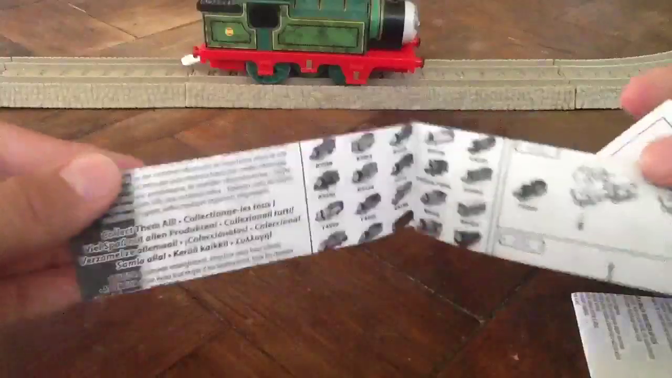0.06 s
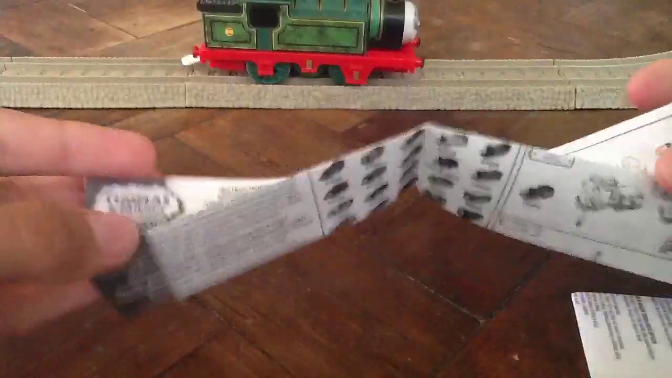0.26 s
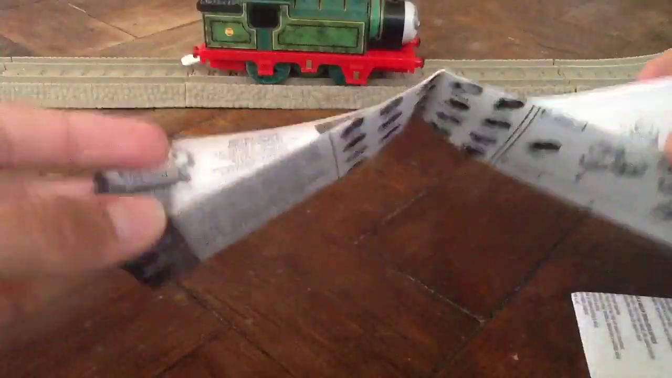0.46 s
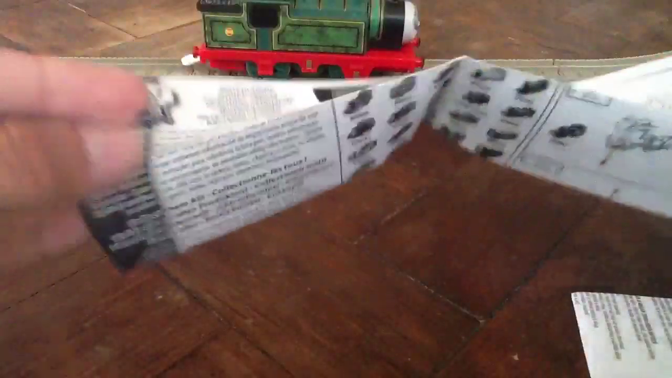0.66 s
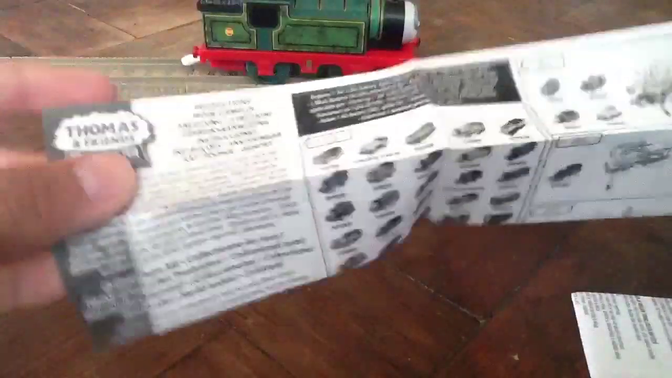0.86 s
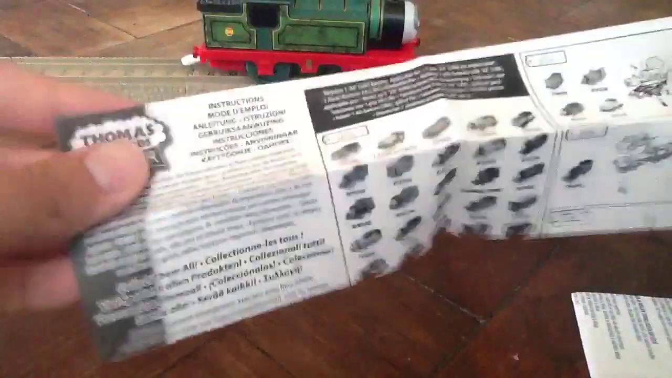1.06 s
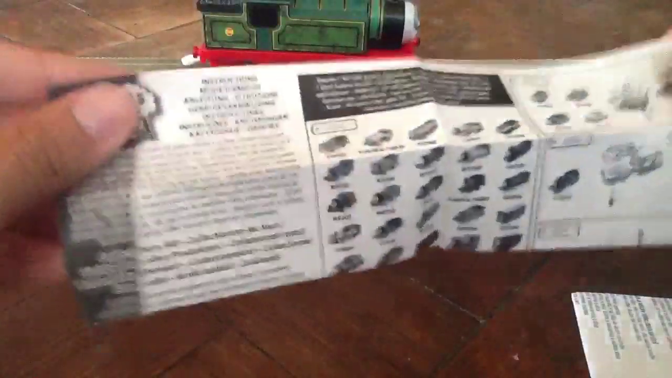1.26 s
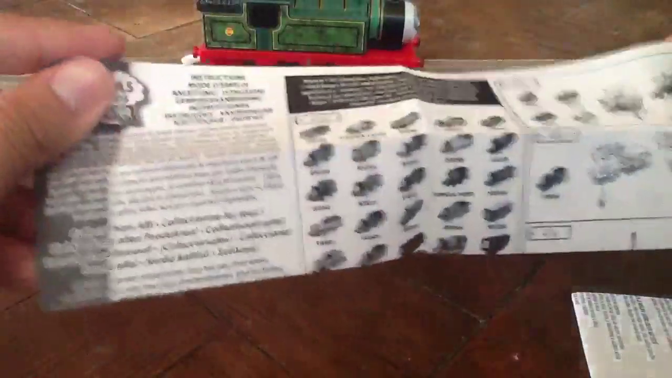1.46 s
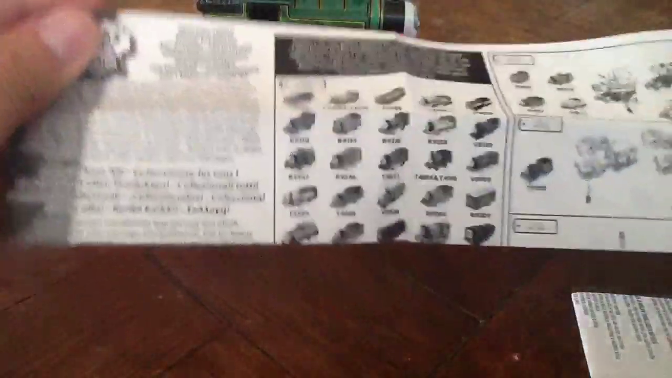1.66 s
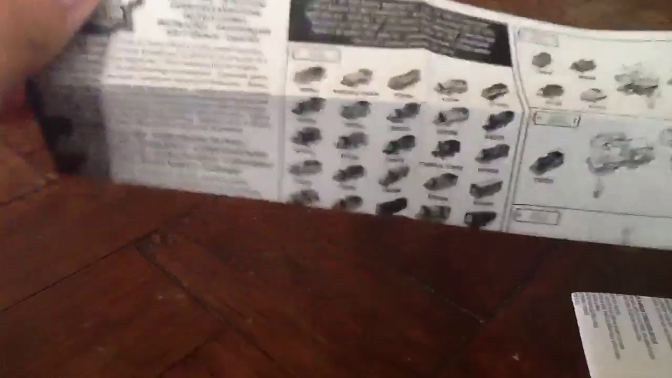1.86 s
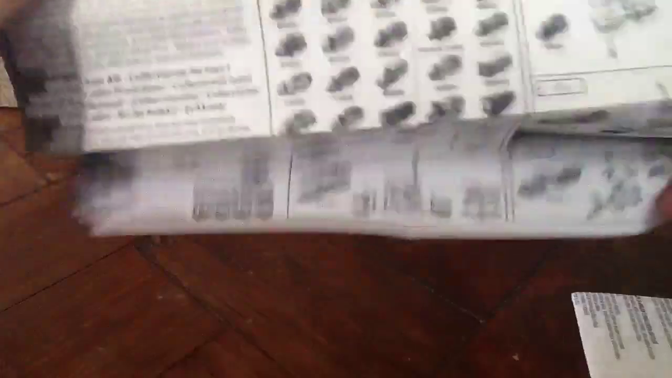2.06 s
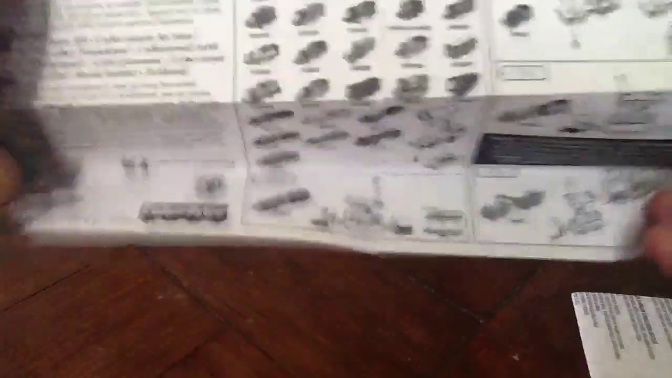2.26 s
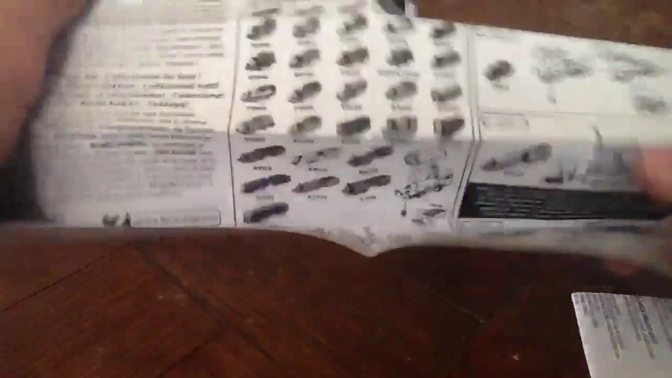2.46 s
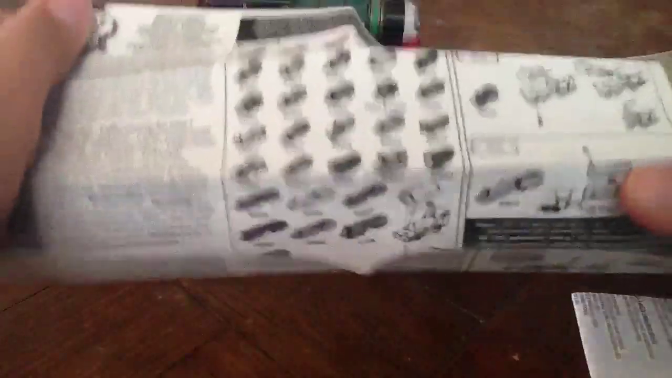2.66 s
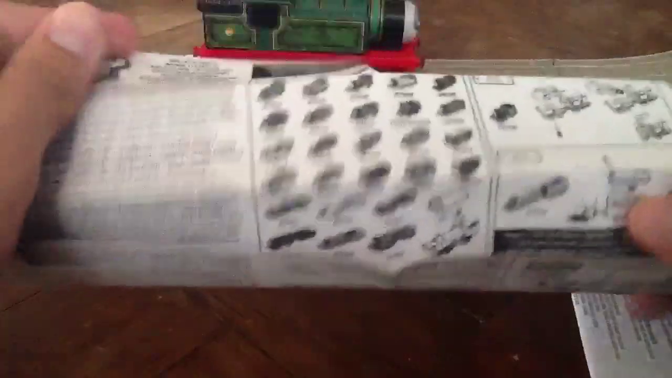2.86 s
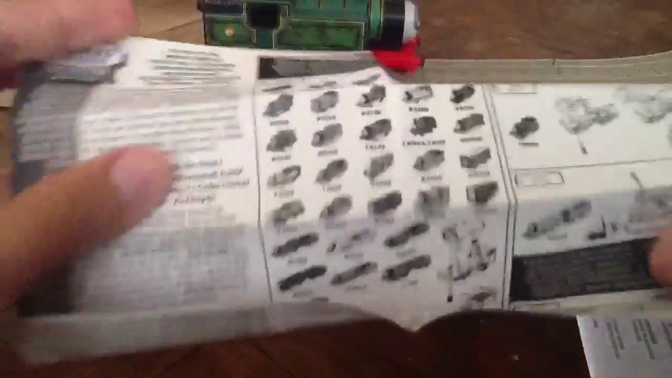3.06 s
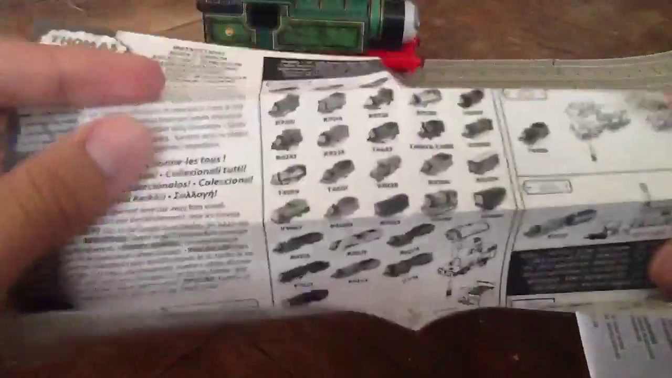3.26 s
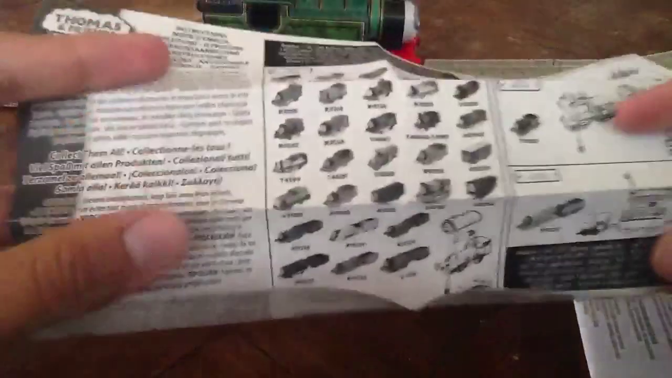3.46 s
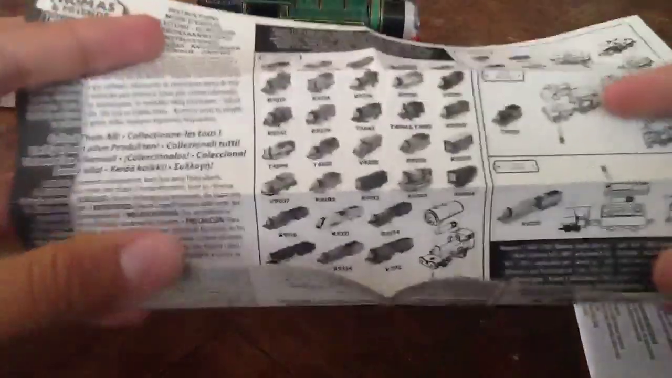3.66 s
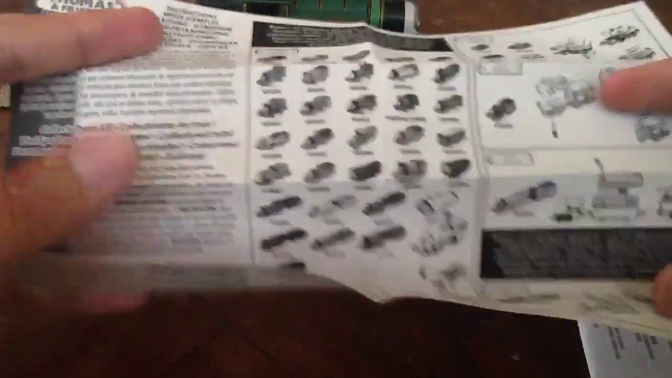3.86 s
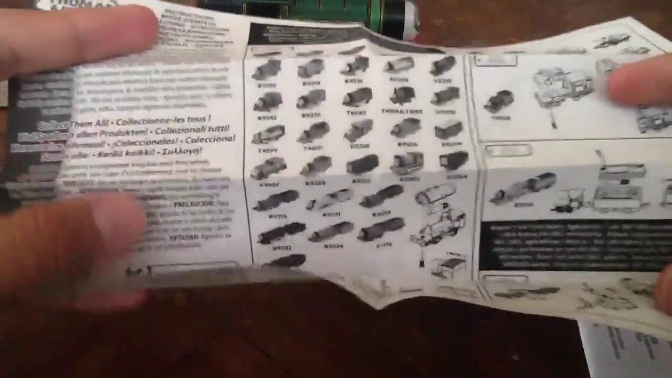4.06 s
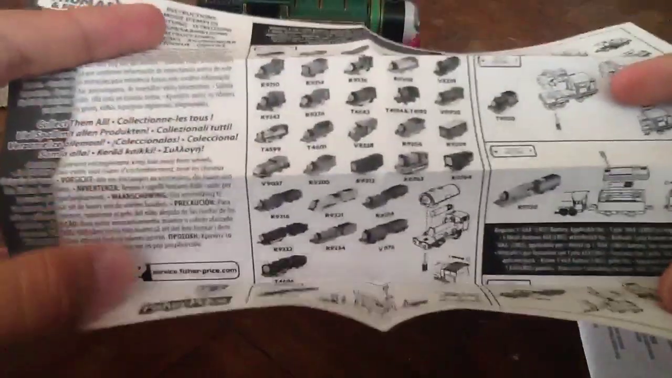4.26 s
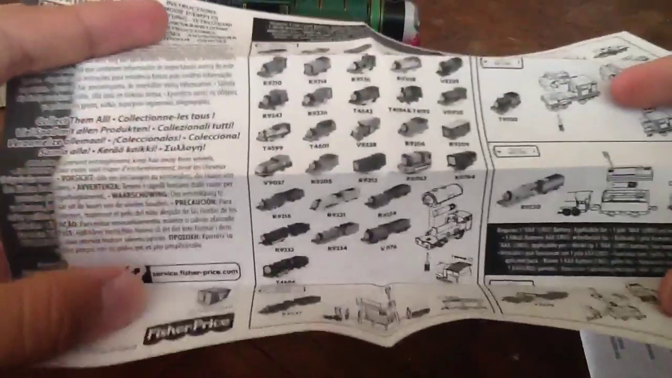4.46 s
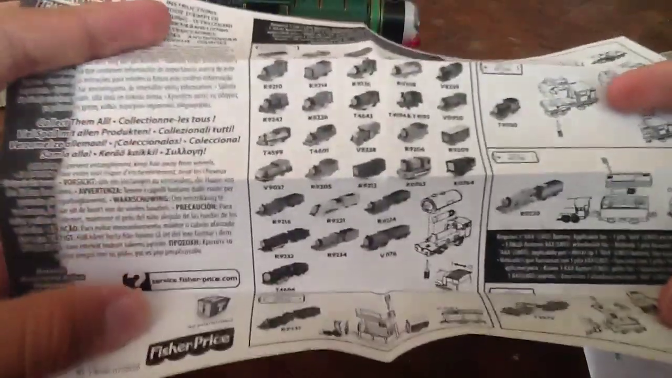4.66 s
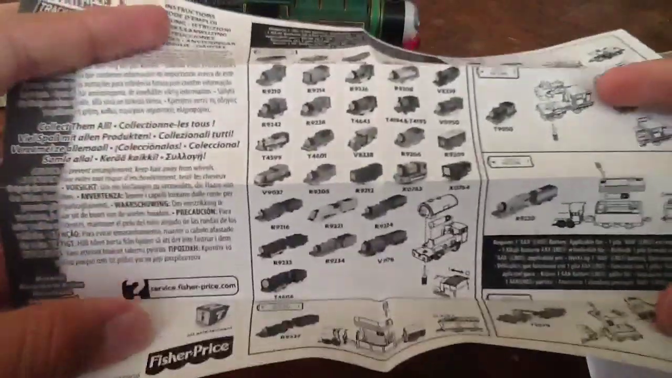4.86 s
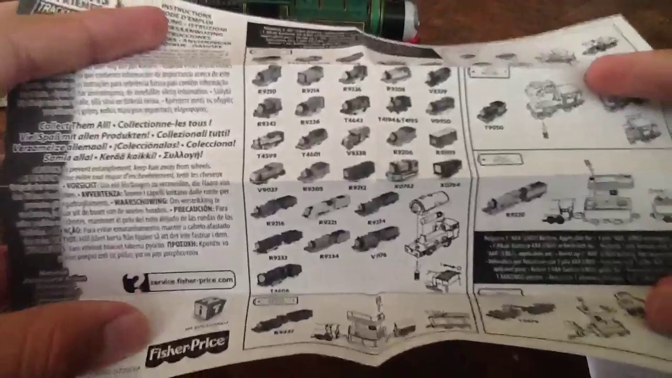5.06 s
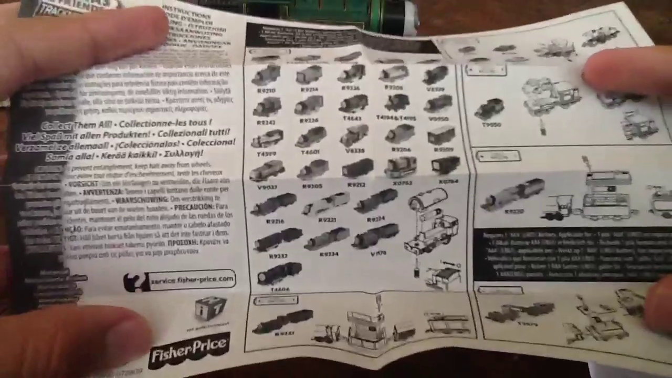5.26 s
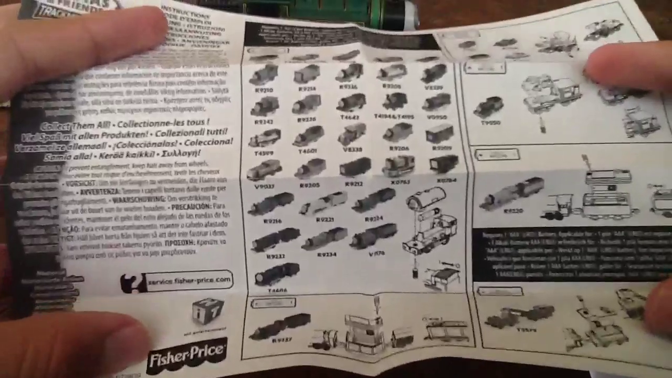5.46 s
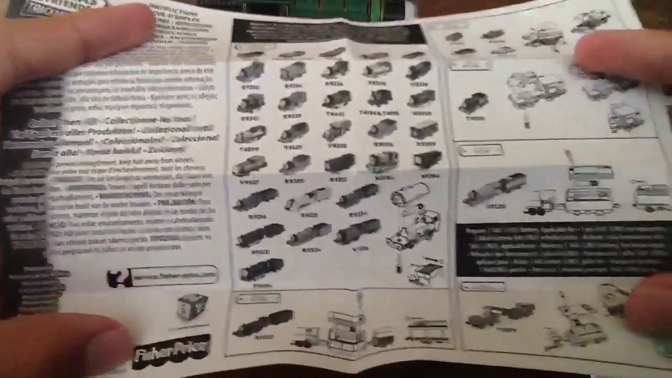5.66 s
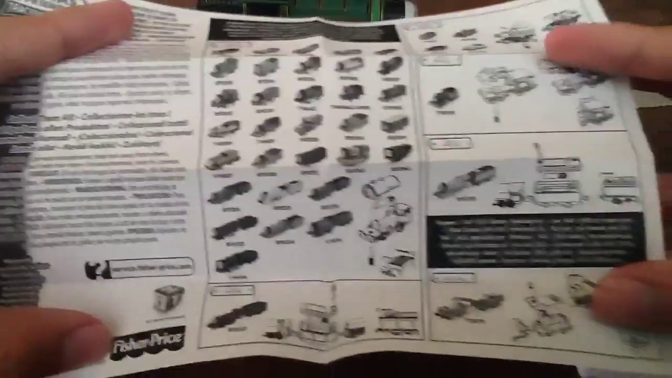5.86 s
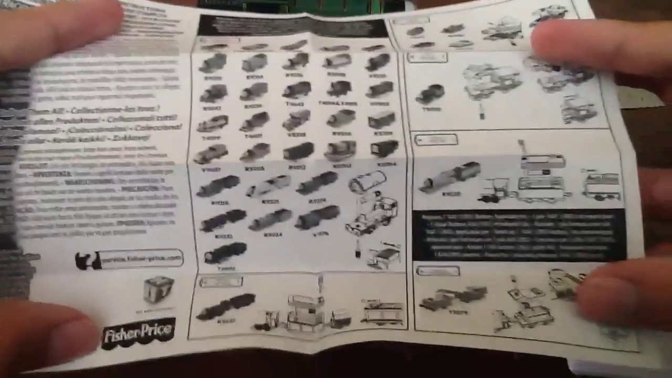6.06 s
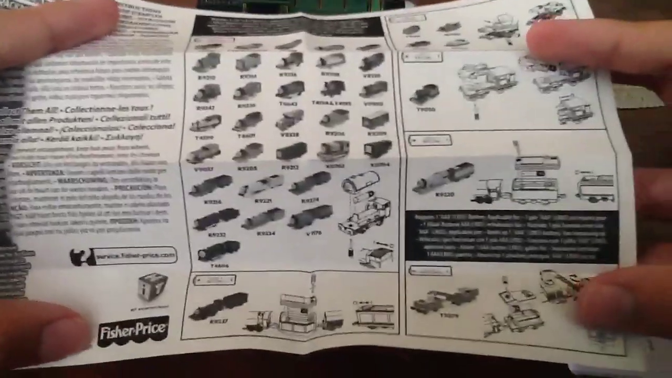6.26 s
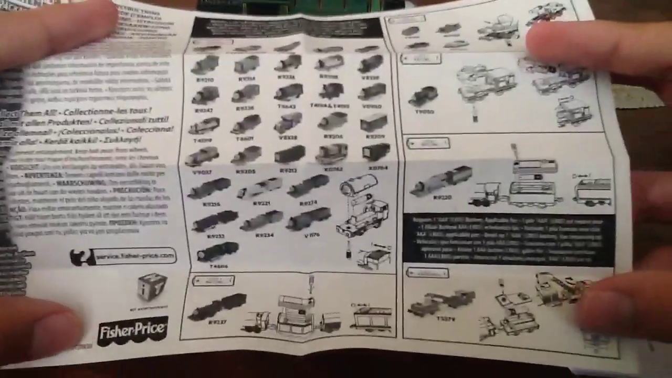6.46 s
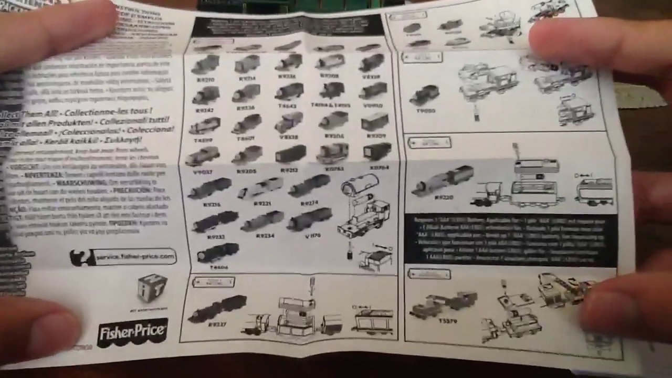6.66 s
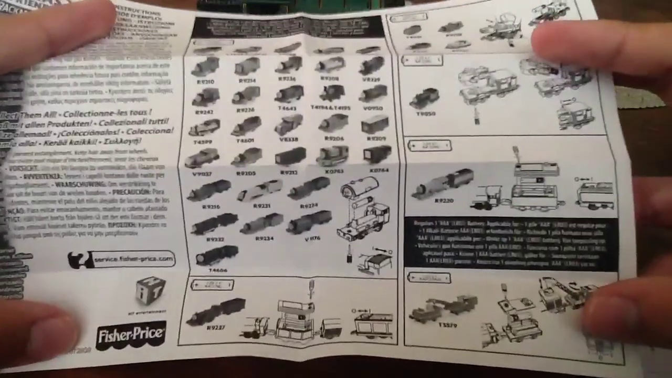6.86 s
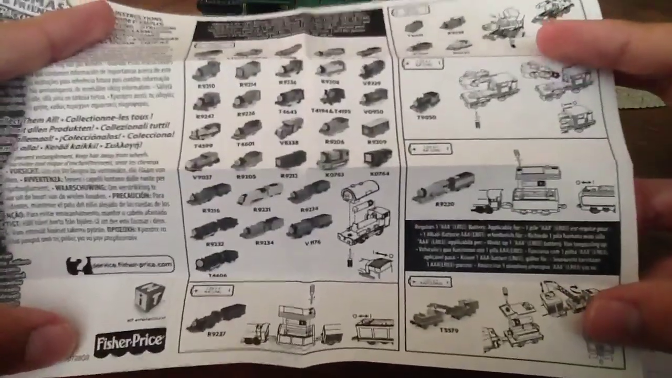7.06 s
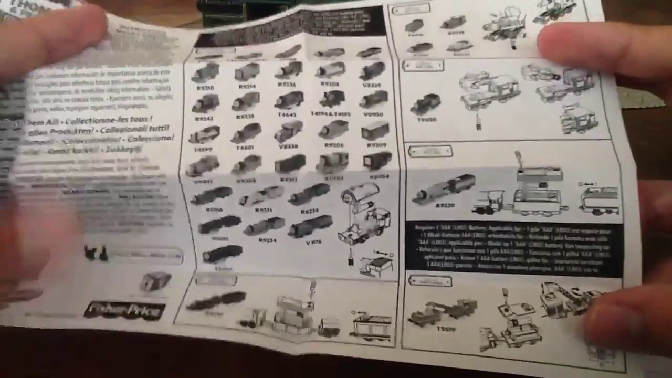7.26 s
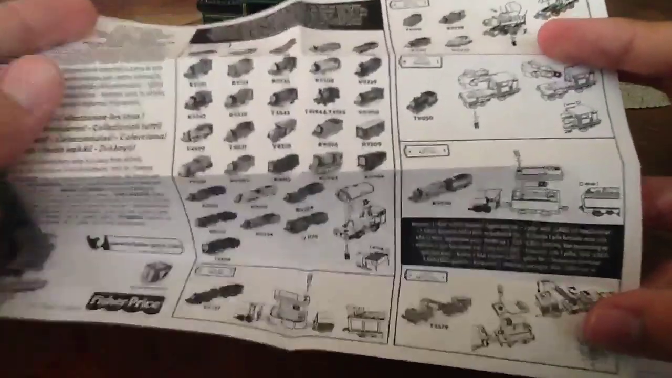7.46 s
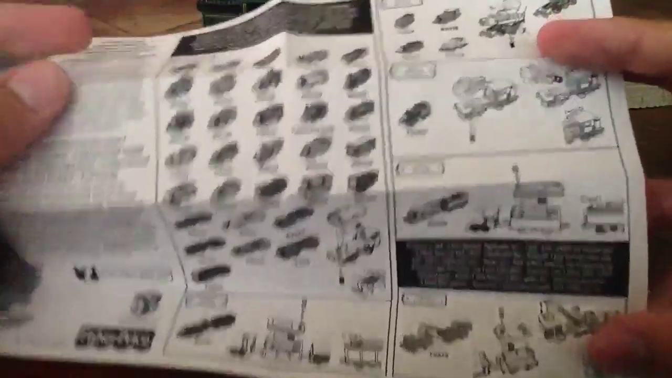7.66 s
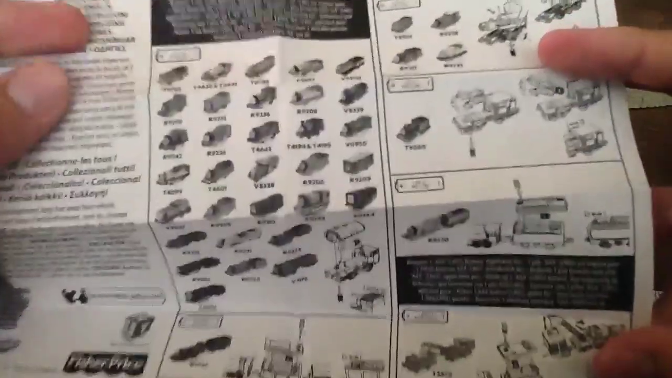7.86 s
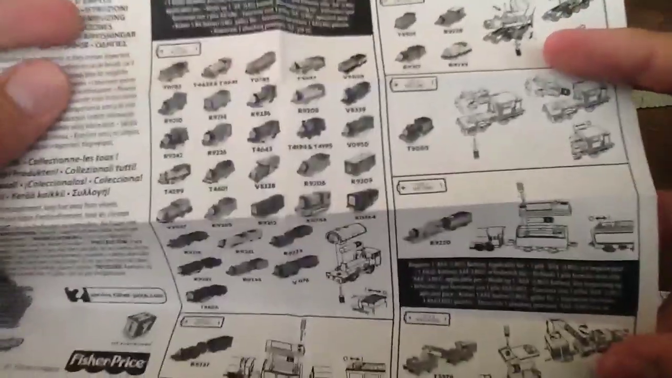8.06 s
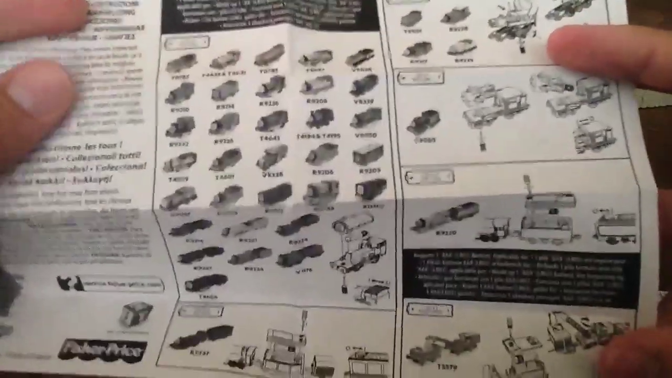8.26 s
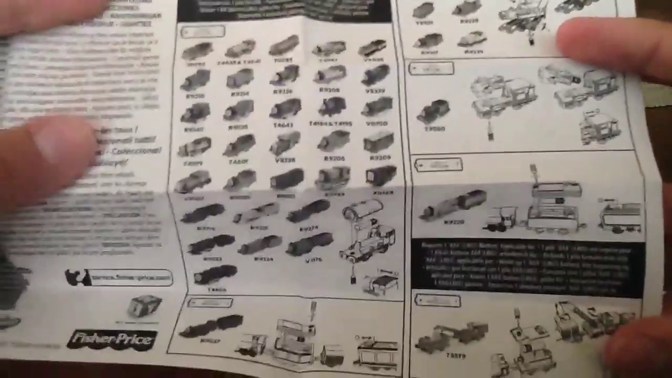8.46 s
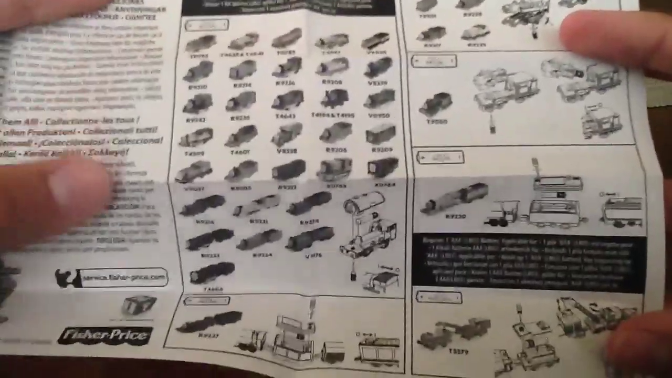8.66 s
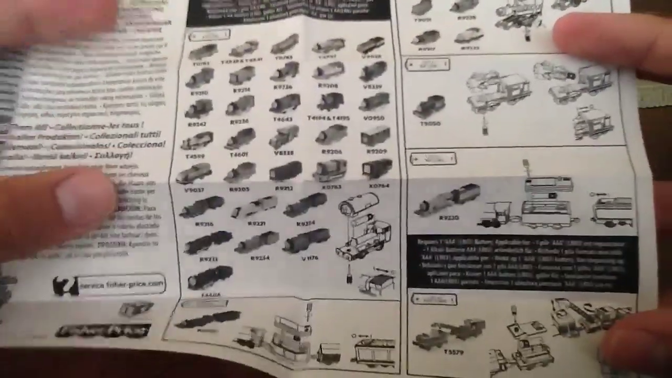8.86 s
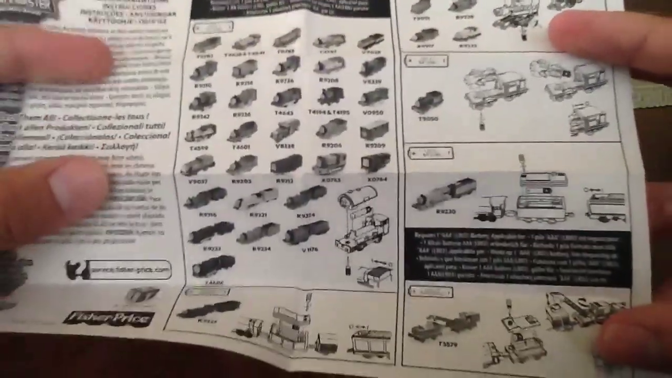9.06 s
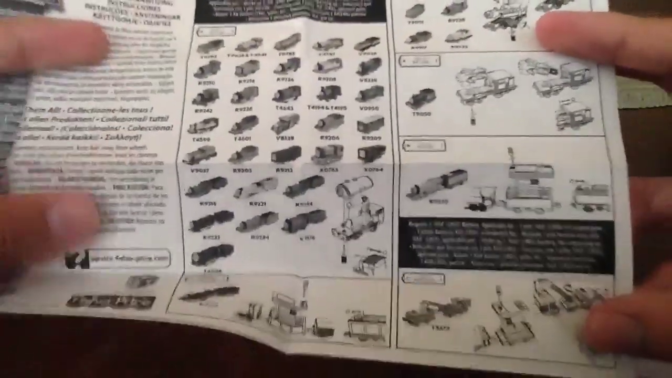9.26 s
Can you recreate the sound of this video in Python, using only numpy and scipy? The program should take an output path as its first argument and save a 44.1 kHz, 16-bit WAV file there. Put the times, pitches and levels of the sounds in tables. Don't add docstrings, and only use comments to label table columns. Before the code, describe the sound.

Thin folded paper crinkles and pops open in quick bursts, one loud snap, then faint finger rustles and small creaks over low room hum.

```python
import sys
import numpy as np
from scipy import signal
from scipy.fft import rfft, irfft
from scipy.io import wavfile
from scipy.ndimage import uniform_filter1d

SR = 44100
rng = np.random.default_rng(int(sys.argv[2]) if len(sys.argv) > 2 else 0)


def waveform_to_disk(signal):
    frames = np.transpose(np.atleast_2d(signal))
    scaled = np.clip(frames, -1, 1) * 32767
    samples = np.round(scaled).astype(np.int16)
    wavfile.write(sys.argv[1], SR, samples)


def volts(x):
    e = np.asarray(x, float) / 20
    return 10 ** e


N = 410130
HZ = np.fft.rfftfreq(N, 1 / SR)

# start in seconds, peak in dB, ring pitch in Hz,
# thump in dB, crisp edge in dB.
SNAPS = [(0.0439, -25, 1920, -9.5, -32), (0.1938, -21.5, 5100, -30, -7), (0.5375, -22, 4250, -11, -11),
         (0.848, -24.5, 1750, -30, -26), (1.624, -37.5, 2480, 2, -21), (1.8262, -35.5, 3500, -27, -26),
         (1.952, -14, 4500, -39, -10), (2.471, -32, 4040, -14, -7), (2.6193, -13.5, 2680, -11, -32),
         (2.8411, -35.5, 3500, -4, -25), (3.0047, -32.5, 1820, -3, -23), (3.1002, -26.5, 1150, 1, -30),
         (3.1661, -13, 4700, -5, -43), (7.8839, -28, 1940, 6, -26), (7.9043, -19, 1530, -26, -13),
         (3.752, -7.5, 4900, -4.5, -9)]
# start in seconds, peak in dB, ring pitch in Hz,
# thump in dB, crisp edge in dB.
POPS = [(0.3768, -34.5, 1660, -2, -27), (0.753, -24.5, 1700, -5, -13), (0.8885, -17, 4300, -8.5, -2),
        (1.263, -36, 1720, 1, -11), (1.5957, -37.5, 1670, -22, -23), (2.0356, -20.5, 4030, -16.5, -10.5),
        (2.2191, -38, 2000, -2, -5), (2.2902, -30.5, 3750, -3, -16), (3.217, -30, 1650, -15, -2.5),
        (3.5786, -25, 4900, -9, -7.5), (7.477, -27.5, 3380, -7, -35), (7.9249, -31, 1660, 5, -19),
        (0.1864, -28.5, 5070, -32, -6), (1.9443, -19, 3700, -9, -28), (0.8871, -18.5, 2820, -22, -29),
        (3.7548, -16, 3440, -4.5, -7.5)]
# start in seconds, peak in dB, ring pitch in Hz, thump in dB.
CRUMPLES = [(0.0099, -36.5, 3950, -2), (0.3512, -35, 4070, -26), (0.879, -28, 2650, -25),
            (1.0642, -37, 3630, -27), (1.1122, -38.5, 3790, -27), (1.3936, -39.5, 1810, 4),
            (1.51, -40.5, 5470, 2.5), (1.5426, -44.5, 1760, 3), (1.7261, -36.5, 6000, 0),
            (1.922, -18, 3650, -12), (2.1877, -40, 4080, 4), (2.5992, -37, 4460, -5),
            (2.6101, -25, 4360, -12), (2.6977, -39, 4120, 0), (3.0253, -36, 1600, 3),
            (3.0498, -34, 1970, -12), (3.3025, -31, 4950, -28), (4.1098, -44, 3450, -14),
            (4.2047, -31.5, 1500, 2), (5.9067, -43.5, 4360, -2), (6.076, -43.5, 4930, -6),
            (6.3498, -46.5, 4500, 2.5), (6.9511, -42, 3000, -2), (8.4376, -48, 1670, -5),
            (8.7131, -44.5, 4000, -7), (9.2148, -39, 1670, -4), (7.08, -50, 1350, 0),
            (0.018, -38, 1700, -10)]
# start in seconds, peak in dB, ring pitch in Hz.
TICKS = [(0.1445, -41.5, 5760), (1.2906, -45, 1720), (2.743, -36, 4230), (4.413, -51.5, 4200),
         (4.502, -52, 4200), (4.549, -48.5, 4200), (4.604, -49.5, 4250), (4.66, -47, 4200),
         (4.707, -50, 4200), (4.8098, -43, 4330), (4.943, -43, 4300), (5.117, -53, 4400),
         (5.135, -47.5, 4300), (5.22, -48.5, 3030), (5.338, -52, 2300), (5.666, -43, 4160),
         (3.141, -40, 1200), (0.56, -40, 1460), (1.767, -41, 1600), (8.403, -45.5, 1610),
         (6.388, -53, 4300), (6.569, -52, 2940), (6.597, -55, 2500), (6.7, -52, 4380),
         (7.3153, -39.5, 2990), (7.442, -39.5, 4200), (7.786, -44, 1530), (7.85, -44, 1500),
         (8.083, -44, 1300), (4.927, -49, 4400), (4.962, -48, 4700), (1.388, -44, 2500), (0.522, -44, 4000),
         (9.05, -49, 4200)]
SNAP_MS, POP_MS, CRUMPLE_MS, TICK_MS = 2.6, 4.2, 8, 2.5
TICK_THUMP_DB, TICK_EDGE_DB = -4, -12
CRUMPLE_EDGE_DB, DULL_ABOVE_DB, DULLING = -6, -39, 2.8

# frequency in Hz, bandwidth in Hz, level in dB.
SHEET = [(415, 137, -1), (823, 72, 0.5), (1129, 49, -7.5), (1710, 62, -4.5), (1774, 82, -1.5),
         (2700, 88, -1.5)]
# frequency in Hz, density in dB per Hz.
PAPER = [(350, 8), (600, -7), (682, -5), (786, -3.5), (1300, -7.5), (1540, 0.5), (2470, -4.5), (2850, -3.5),
         (3540, -1.5), (4140, 0.5), (6080, -1.5), (7570, -15.5), (13000, -11.5)]

# start in seconds, length in seconds,
# rustle in dB, body relative to the rustle in dB.
UNFOLD = [(0.0, 0.056, -50.5, -6), (0.203, 0.1, -52, -11), (0.301, 0.1, -50.5, -12),
          (0.471, 0.024, -47.5, -17), (0.52, 0.044, -60, -1), (0.641, 0.054, -48, -15.5),
          (0.733, .1, -49, -14), (0.846, 0.059, -43.5, -6.5), (0.937, 0.21, -52, -6.5),
          (1.239, 0.059, -53, -7), (1.34, 0.047, -53, -4), (1.377, 0.038, -46.5, -13),
          (1.384, 0.35, -55.5, -9), (1.914, 0.032, -52, 8.5), (1.958, 0.06, -46.5, -23),
          (2.025, 0.03, -47.5, -3), (2.2, 0.027, -48.5, -2.5), (2.264, 0.077, -48.5, -8),
          (2.385, 0.15, -48.5, -9), (2.575, 0.02, -49, -15), (2.59, 0.031, -42, -18),
          (2.628, 0.13, -57.5, -4), (2.833, 0.26, -49, -5.5), (3.057, 0.25, -53.5, -8),
          (3.288, 0.051, -49.5, -6), (3.397, 0.12, -54, -10), (3.558, 0.017, -43.5, -5),
          (3.592, 0.092, -53.5, -5), (3.738, 0.01, -45, -5), (3.765, 0.055, -43.5, -1),
          (3.825, 0.058, -51.5, -1), (3.888, 0.044, -51, -7), (3.981, 0.062, -51.5, -5),
          (4.123, 0.041, -54, -2.5), (0.088, 0.012, -55, -9), (1.0, 0.036, -49, -11),
          (1.056, 0.024, -49, -16), (1.165, .035, -59, -13), (2.883, 0.024, -51, 1),
          (3.224, 0.041, -46.5, -5), (3.456, 0.024, -59, -3), (2.628, 0.015, -49, 6.5)]
# start in seconds, length in seconds,
# rustle in dB, body relative to the rustle in dB.
HOLD = [(4.871, 0.11, -57, -4), (5.011, 0.063, -56, -5), (5.062, 0.36, -66.5, -1), (5.267, 0.044, -61, -6),
        (5.445, 0.12, -65.5, -0.5), (5.506, 0.15, -59, -6), (5.636, 0.11, -55.5, -4),
        (5.753, 0.11, -63.5, 1), (5.835, 0.11, -56, -3.5), (5.95, 0.33, -65.5, 0), (6.074, 0.09, -56, -12),
        (6.345, 0.27, -62, -3.5), (6.872, 0.26, -63.5, -4), (6.992, 0.1, -60.5, 2.5),
        (7.192, 0.063, -54, -7), (7.246, 0.75, -63.5, -4.5), (7.328, 0.024, -51, -10),
        (7.36, .144, -59, -3.5), (7.589, 0.16, -55, -13), (7.812, 0.066, -56, -2), (7.884, .052, -54.5, -5),
        (8.046, 0.082, -49.5, -8.5), (8.198, 0.55, -60.5, -10), (8.525, 0.091, -56, -9),
        (8.685, 0.06, -52.5, -4), (8.786, 0.71, -57, -9.5), (9.017, 0.14, -57.5, -6),
        (9.107, 0.031, -51, -5), (9.151, 0.022, -47, -3.5), (9.178, 0.046, -54.5, 1),
        (5.159, 0.016, -59, 1), (8.728, 0.021, -56, -3), (9.276, 0.033, -52.5, -9)]
# time in seconds, rustle in dB.
GRIP = [(0, -59), (.6, -56.5), (1.1, -60), (1.2, -61.5), (1.9, -57.5), (2.15, -60), (2.3, -56.5),
        (3.5, -51.5), (3.68, -62), (3.95, -59), (4.18, -61), (4.21, -50), (4.26, -61), (4.3, -67.5),
        (9.3, -82)]
# start in seconds, length in seconds, hiss in dB.
WIPES = [(0.141, 0.016, -50), (0.18, 0.031, -54), (0.317, 0.042, -51.5), (1.1, 0.033, -52),
         (1.238, 0.034, -56.5), (1.721, .05, -55.5), (2.204, .06, -56), (2.39, 0.029, -51),
         (2.44, 0.04, -51), (2.588, .04, -48), (3.218, .05, -55), (3.567, 0.029, -53), (2.874, 0.071, -61),
         (3.015, 0.047, -57), (3.34, .04, -59), (7.195, 0.058, -56.5), (7.588, 0.081, -62),
         (8.992, 0.079, -64)]
GRIP_BODY_DB, BRIGHT_DB = -11, -3.5
HISS_DB, HISS_SLOPE, HISS_FLOOR_DB = -7.5, -0.016, -75
SAG_DB, RELEASE_S = -2, 0.0029

# start in seconds, peak in dB, pitch in Hz.
FLAPS = [(0.009, -43, 235), (0.884, -38, 290), (1.743, -49, 230), (1.917, -33, 324), (1.945, -32.5, 370),
         (2.035, -37.5, 242), (2.195, -37.5, 194), (2.225, -41.5, 340), (2.283, -43, 171),
         (2.308, -43, 147), (2.465, -43, 179), (2.506, -48.5, 260), (2.613, -29.5, 320),
         (2.689, -45.5, 188), (3.024, -44, 236), (3.094, -44.5, 215), (3.139, -40, 251), (3.157, -36, 282),
         (3.213, -43, 252), (3.559, -38.5, 286), (1.941, -27.5, 685), (3.746, -36, 298), (3.905, -50, 260),
         (4.2, -45, 344), (7.224, -49.5, 550), (7.477, -38, 252), (7.897, -43, 222), (7.924, -39.5, 230),
         (8.078, -51, 304), (8.7, -49.5, 267), (9.209, -50.5, 270), (0.136, -47.5, 414),
         (1.059, -49.5, 240), (2.036, -35.5, 750), (2.052, -40, 303), (2.062, -48, 820), (2.222, -46, 780),
         (2.385, -45, 605), (2.524, -50, 330), (2.946, -50, 253), (3.24, -61, 700), (5.874, -49.5, 270),
         (7.492, -47, 245), (7.605, -53, 604), (7.847, -52, 250), (8.047, -51, 560), (8.353, -50, 260)]

ROOM_T60_S, ROOM_WET_DB = 0.23, -14.5
# frequency in Hz, density in dB per Hz.
ROOM = [(24, -69), (40, -21), (95, -11), (120, -3.5), (160, -1.5), (240, -0.5), (291, 0.0), (496, -6.0),
        (886, -16.5), (2220, -18), (5440, -22)]
ROOM_DB = -56.5
# frequency in Hz, level in dB.
HUM = [(177.6, -70), (240, -65), (360.7, -70), (2358, -84.5), (8291, -90)]

DUCK_S, DUCK_DB, RECOVER_S = 3.752, -1.5, 1.54
# frequency in Hz, step in dB over the usual line at 11-12 kHz.
STEP = [(12000, -40), (12400, -8), (13100, -3), (13160, 2), (13790, 3), (13830, 12), (15400, 8.5),
        (15450, 40)]
MASK_ABOVE_DB, MASKING = 13, 0.24


def buckles():
    rows = [(*row, SNAP_MS) for row in SNAPS]
    rows += [(*row, POP_MS) for row in POPS]
    for row in CRUMPLES:
        edge_db = CRUMPLE_EDGE_DB - DULLING * max(row[1] - DULL_ABOVE_DB, 0)
        rows.append((*row, edge_db, CRUMPLE_MS))
    rows += [(*row, TICK_THUMP_DB, TICK_EDGE_DB, TICK_MS) for row in TICKS]
    return rows


def sheet(t, detune):
    ring = 0
    for (hz, width_hz, db), d in zip(SHEET, detune):
        mode = np.sin(2 * np.pi * hz * (1 + 0.019 * d) * t)
        ring = ring + volts(db) * mode * np.exp(-np.pi * width_hz * t)
    return ring


def snaps():
    size = 4096
    out = np.zeros(N + size)
    t, f = np.arange(size) / SR, np.fft.rfftfreq(size, 1 / SR)
    broad = shape(PAPER, f) * bell(f, 2640, 0.97)
    rows = buckles()
    noises = rng.standard_normal((len(rows), 4, size))
    for (s, peak_db, hz, thump_db, edge_db, ms), noise in zip(rows, noises):
        tau = np.clip(ms, 1.2, 6.5) / 1000
        slow_rise = tau * 30

        def burst(x, gain, stretch, rise):
            env = (1 - np.exp(-t / (rise * tau))) * np.exp(-t / (stretch * tau))
            y = coloured(x, gain) * env
            return y * np.sqrt(np.sum(env ** 2) / np.sum(y ** 2))

        tilt = ((f + 1) / 3000) ** (0.15 * np.log2(hz / 3000))
        crack = volts(2.5) * burst(noise[0], bell(f, hz, 0.12), 0.8, slow_rise)
        crack += volts(1.5) * burst(noise[1], broad * tilt, 0.96, slow_rise)
        crack += volts(thump_db - 1.5) * burst(noise[2], bell(f, 577, 0.56), 1.48, 0.71)
        crack += volts(thump_db + 1.5) * sheet(t, noise[2]) * (1 - np.exp(-t / (0.63 * tau)))
        crack += volts(edge_db + 5.0) * burst(noise[3], bell(f, 3970, 1.0), 0.73, 0.06)
        click = np.sin(2 * np.pi * 0.7 * hz * t) * np.exp(-t * hz / 2.3)
        crack += 2.3 * np.exp(-(ms / 4) ** 2) * click
        i = int(s * SR)
        out[i:i + size] += volts(peak_db - 6.0) * crack
    return out[:N]


def strokes():
    t = np.arange(N) / SR
    rustle = volts(np.interp(t, *np.transpose(GRIP))) ** 2
    body = rustle * volts(GRIP_BODY_DB) ** 2
    for s, length, db, body_db in UNFOLD + HOLD:
        held = slice(max(int(s * SR), 0), int((s + length + 8 * RELEASE_S) * SR))
        age = t[held] - s
        sag_db = SAG_DB * (np.minimum(age / length, 1) - 0.5)
        release = np.exp(-np.maximum(age - length, 0) / RELEASE_S)
        power = volts(db + sag_db) ** 2 * release
        rustle[held] += power
        body[held] += power * volts(body_db) ** 2
    rustle_db = uniform_filter1d(10 * np.log10(rustle), size=300)
    body_db = uniform_filter1d(10 * np.log10(body / rustle), size=300)
    hiss = volts(HISS_DB + HISS_SLOPE * (rustle_db + 63)) ** 2
    hiss += volts(HISS_FLOOR_DB + duck_db() - rustle_db) ** 2
    for s, length, db in WIPES:
        fade = np.clip(np.minimum(t - s, s + length - t) / 0.0066, 0, 1)
        hiss += volts(db - rustle_db) ** 2 * fade
    return rustle_db, body_db, 10 * np.log10(hiss)


def grains(rate, spread_db, t60):
    when, size = rng.random((2, 5000))[:, :int(rate * N / SR)]
    hits = np.zeros(N)
    hits[(when * N).astype(int)] = volts(spread_db * np.minimum(-np.log(1 - size), 2.4))
    decay = 1000. ** (-1 / (t60 * SR))
    env = signal.lfilter([1], [1, -decay], hits)
    return env / np.sqrt(np.mean(env ** 2))


def slide():
    rustle_db, body_db, hiss_db = strokes()
    bright_db = BRIGHT_DB + 3 * walk(4.6) + 0.65 * np.clip(hiss_db - HISS_DB, -4, 4)
    slips = grains(160, 4.7, 0.04)
    resonance = 1 + 0.36 * bell(HZ, 4340, 0.11)
    bands = ((450, 2300, body_db, 0), (2300, 6500, 0, bright_db), (6500, 15500, hiss_db, 0))
    out = 0
    for low_hz, top_hz, db, tilt_db in bands:
        grit = np.sqrt(0.41 + 0.23 * slips ** 2 + 0.088 * grains(99, 0.67, 0.12) ** 2)
        centres = np.geomspace(low_hz, top_hz, 7)[1::2]
        octaves = np.log2(top_hz / low_hz) / 7
        spectrum = rfft(rng.standard_normal(N)) * shape(PAPER, HZ) * resonance
        parts = [irfft(spectrum * bell(HZ, hz, octaves), N) for hz in centres]
        band = 0
        for k, part in enumerate(parts):
            flutter = np.sqrt(0.65 + 0.38 * grains(260, 3.3, 0.015) ** 2)
            drift_db = 2.0 * walk(24) + 0.16 * (k - 1) * (tilt_db - 8.5)
            band = band + part * flutter * volts(drift_db)
        out = out + volts(rustle_db + db) * grit * band / np.std(sum(parts))
    return out


def flaps():
    size = 8192
    out, t = np.zeros(N + size), np.arange(size) / SR
    f = np.fft.rfftfreq(size, 1 / SR)
    for (s, peak_db, hz), noise in zip(FLAPS, rng.standard_normal((len(FLAPS), size))):
        wave = np.sin(2 * np.pi * hz * t) + 0.7 * coloured(noise, bell(f, hz, 0.75))
        env = (1 - np.exp(-t / 0.00028)) * np.exp(-t * hz / 2.95)
        i = int((s + 0.00428) * SR)
        out[i:i + size] += volts(peak_db + 2.5) * wave * env
    return out[:N]


def room(x):
    t = np.arange(int(0.4 * SR)) / SR
    spectrum = rfft(rng.standard_normal(len(t)) * 1000. ** (-t / ROOM_T60_S))
    even = spectrum / np.sqrt(uniform_filter1d(abs(spectrum) ** 2, size=50))
    tail = irfft(even, len(t)) * (1 - np.exp(-t / 0.0018)) * (t < 0.3)
    tail = signal.lfilter([1], [1, -0.15], tail)
    tail /= np.sqrt(np.sum(tail ** 2))
    return volts(ROOM_WET_DB) * signal.fftconvolve(x, tail)[:N]


def background():
    t = np.arange(N) / SR
    rumble = volts(-72.5 + 1.6 * walk(2.7)) * coloured(rng.standard_normal(N), bell(HZ, 400, 0.49))
    tones = 0
    for hz, db in HUM:
        level = volts(db + 3 + 3.0 * walk(3.725))
        tones = tones + level * np.sin(2 * np.pi * hz * t + 1.7 * walk(4))
    hush = volts(ROOM_DB) * coloured(rng.standard_normal(N), shape(ROOM, HZ))
    return volts(duck_db()) * (hush + tones + rumble)


def duck_db():
    age = np.arange(N) / SR - DUCK_S
    return DUCK_DB * np.exp(-np.maximum(age, 0) / RECOVER_S) * (age > 0)


def shape(table, hz):
    f, db = np.transpose(table)
    return volts(np.interp(np.log(hz + 1), np.log(f), db))


def bell(hz, centre_hz, octaves):
    return np.exp(-0.5 * (np.log2((hz + 1) / centre_hz) / octaves) ** 2)


def coloured(x, gain):
    y = irfft(rfft(x) * gain, len(x))
    return y / np.sqrt(np.mean(y ** 2))


def walk(rate):
    k = int(SR / rate)
    held = np.repeat(rng.standard_normal(N // k + 1), k)
    return 1.26 * uniform_filter1d(uniform_filter1d(held, k), k)[:N]


def scene():
    radiation = signal.butter(3, 125, "high", fs=SR, output="sos")
    paper = signal.sosfilt(radiation, snaps() + slide() + flaps())
    return (paper + room(paper) + background())[None]


def top_cut(x):
    return signal.sosfilt(signal.butter(12, 16470, fs=SR, output="sos"), x)


def record(dry):
    x = signal.sosfilt(signal.butter(2, 90, "high", fs=SR, output="sos"), dry[0])
    window = np.sin(np.pi * (np.arange(2048) + 0.5) / 2048)
    f, _, lines = signal.stft(x, SR, window, 2048, 1024)
    frame_db = 10 * np.log10(np.sum(abs(lines) ** 2, axis=0))
    excess_db = np.maximum(frame_db - np.median(frame_db) - MASK_ABOVE_DB, 0)
    usual = np.median(abs(lines[(f > 11000) & (f < 12000)]))
    step = usual * shape(STEP, f)[:, None] * volts(MASKING * excess_db)
    keep = (abs(lines) > step) | (f < 12000)[:, None]
    mix = signal.istft(lines * keep, SR, window, 2048, 1024)[1][:N]
    return top_cut(mix[None])


dry = scene()
out = record(dry)
waveform_to_disk(out)
```